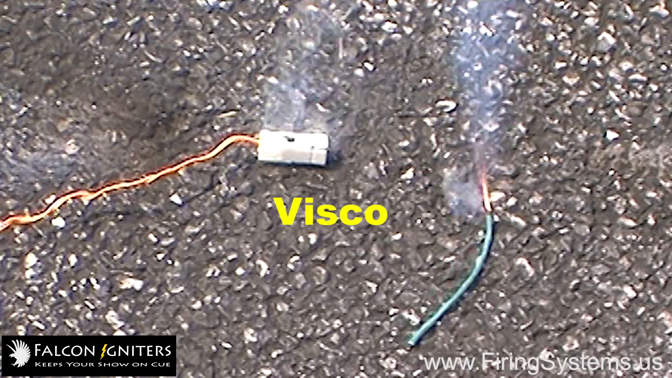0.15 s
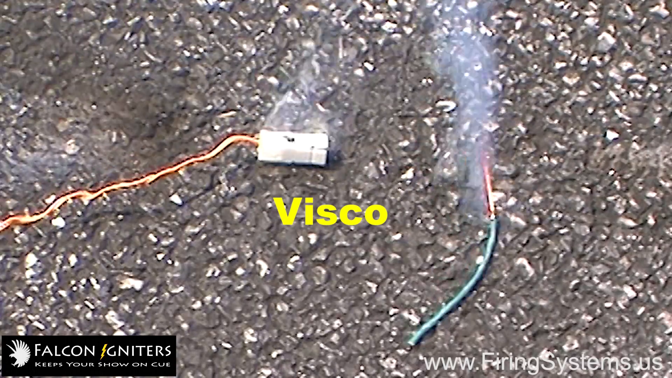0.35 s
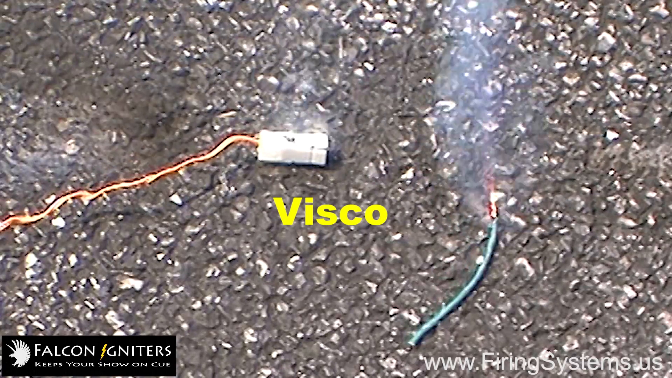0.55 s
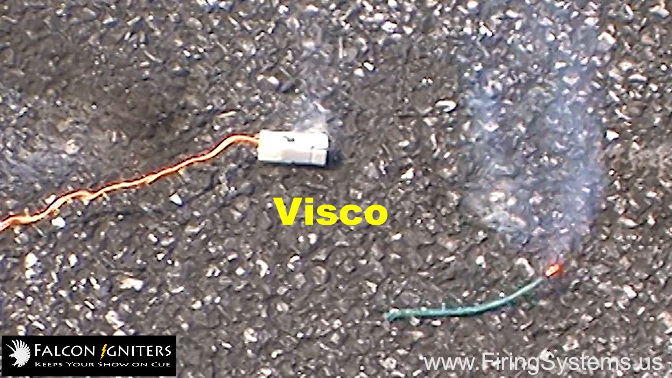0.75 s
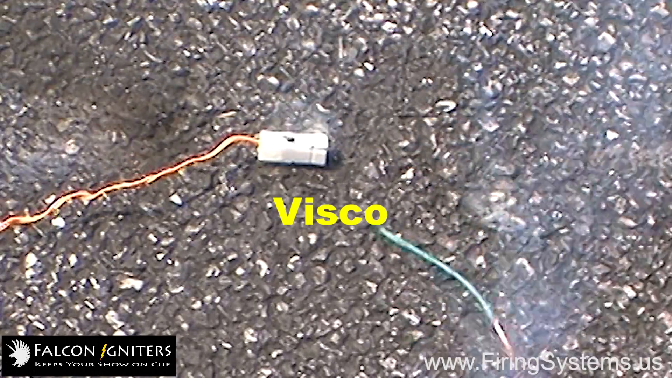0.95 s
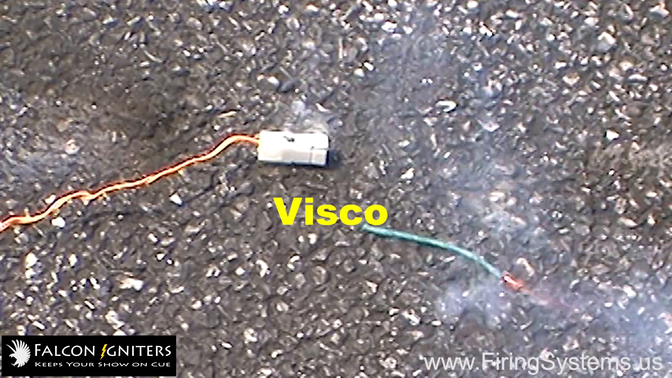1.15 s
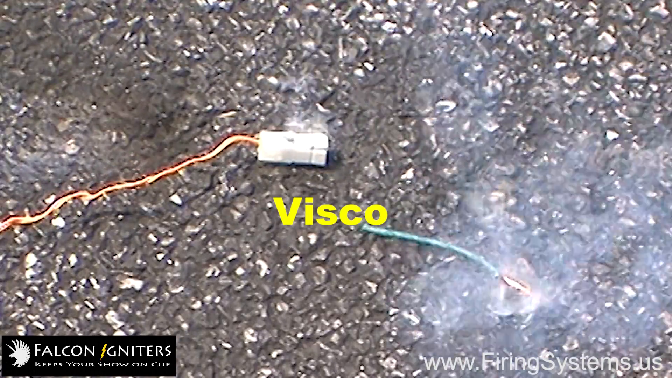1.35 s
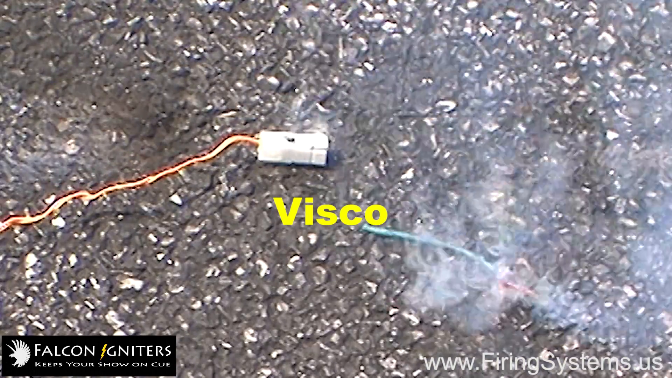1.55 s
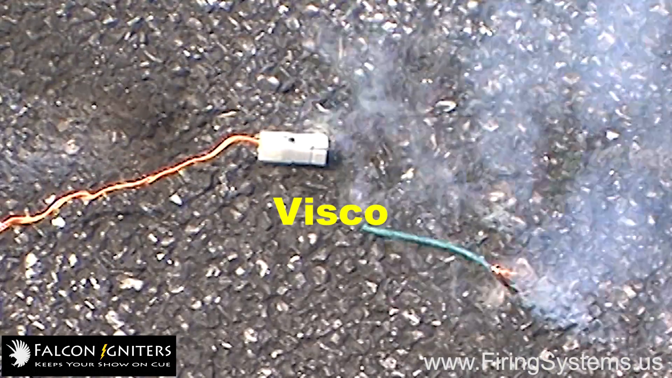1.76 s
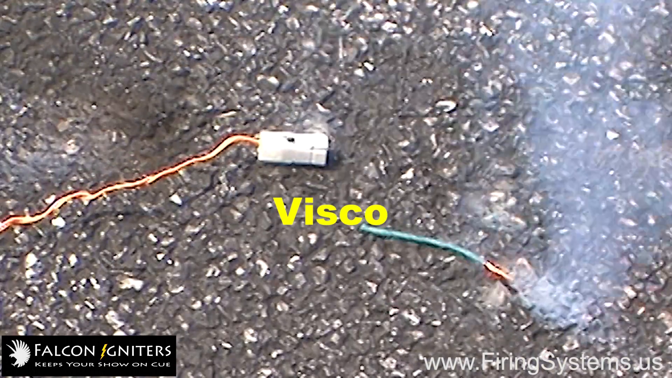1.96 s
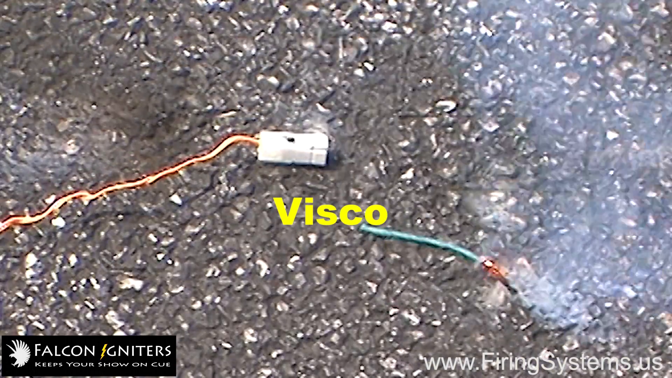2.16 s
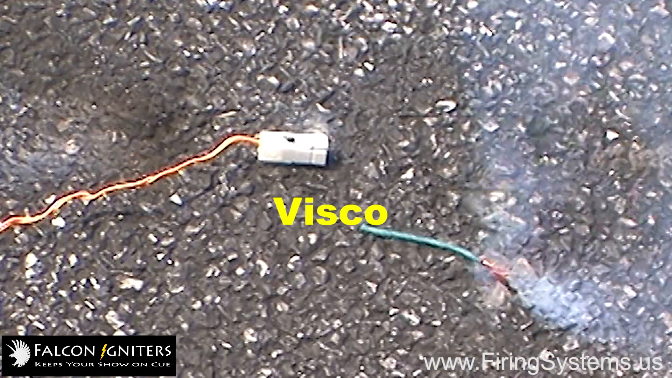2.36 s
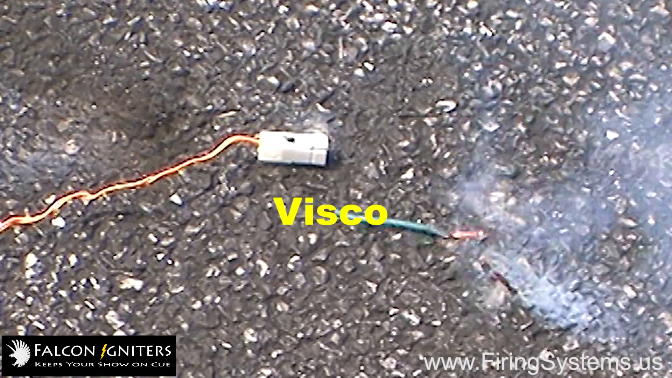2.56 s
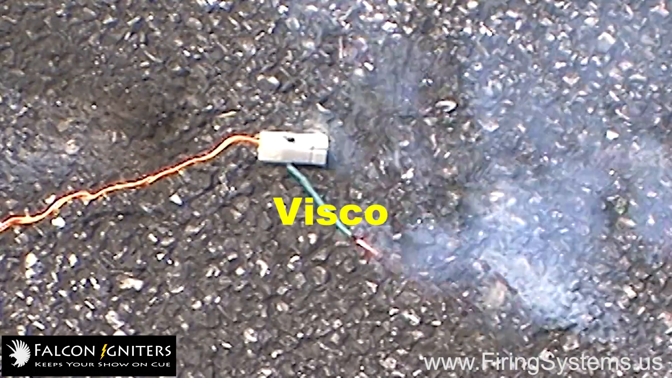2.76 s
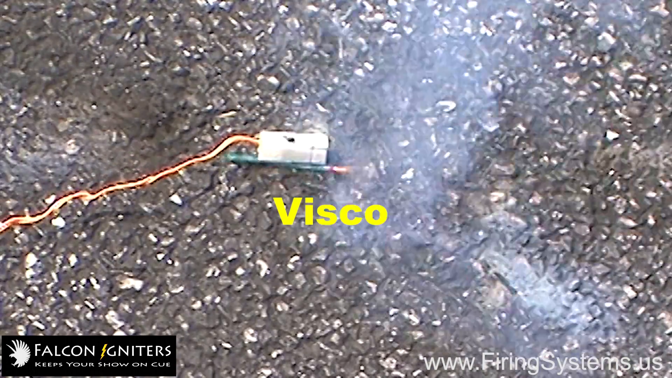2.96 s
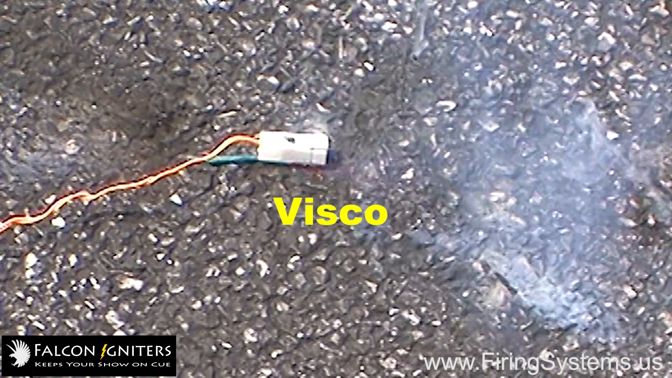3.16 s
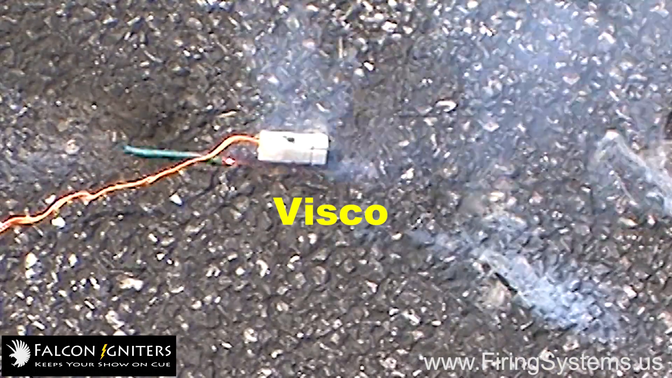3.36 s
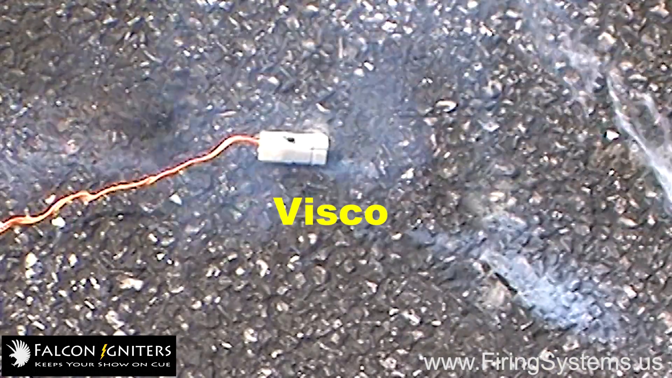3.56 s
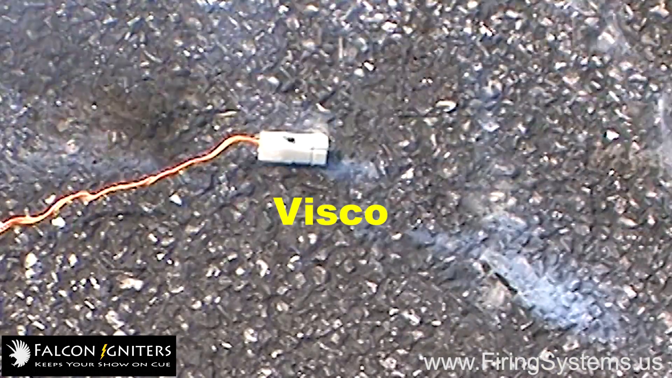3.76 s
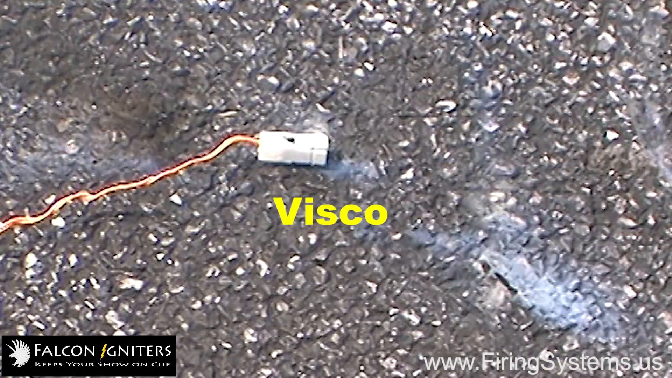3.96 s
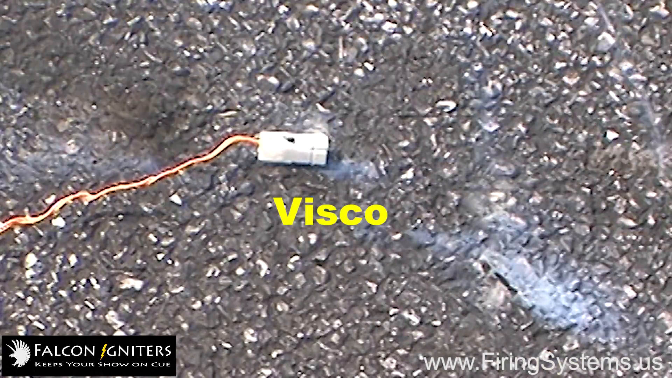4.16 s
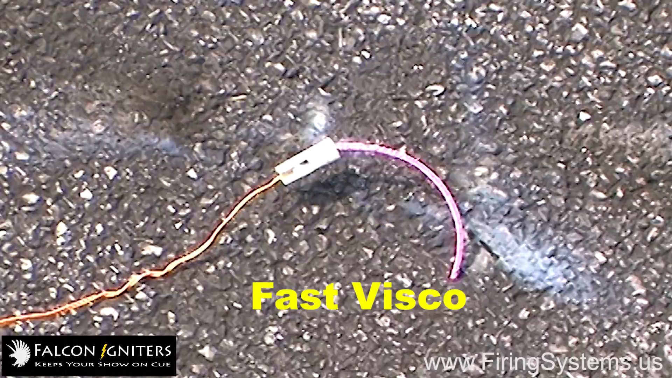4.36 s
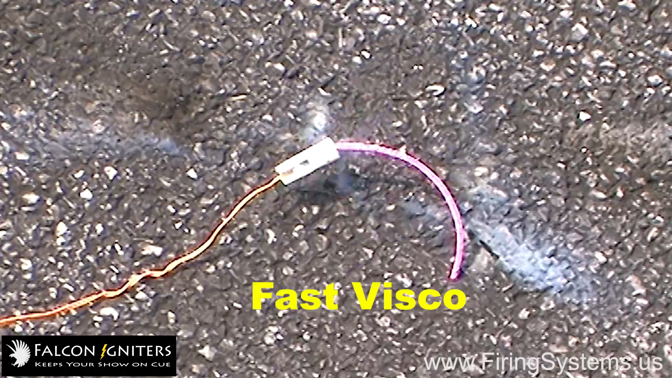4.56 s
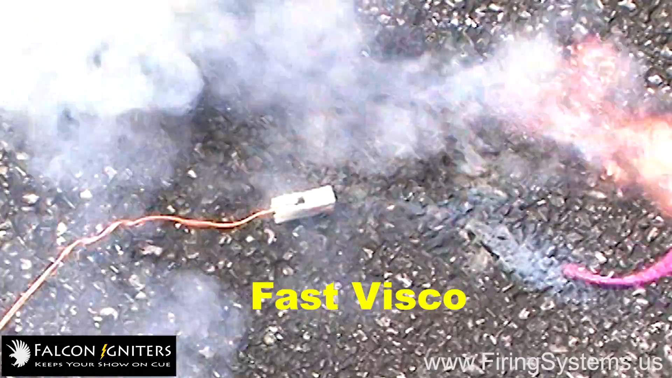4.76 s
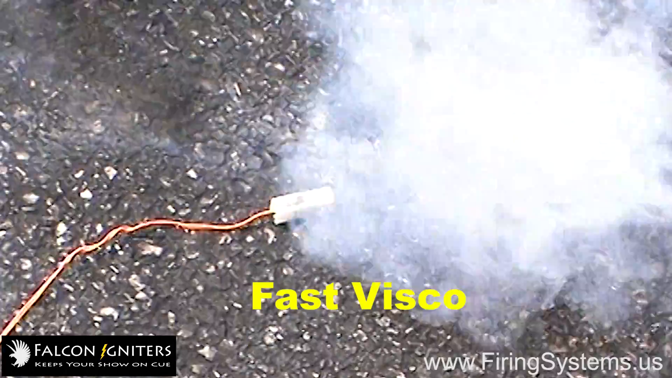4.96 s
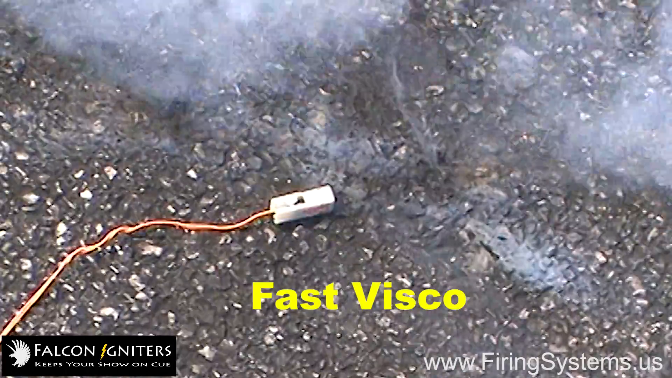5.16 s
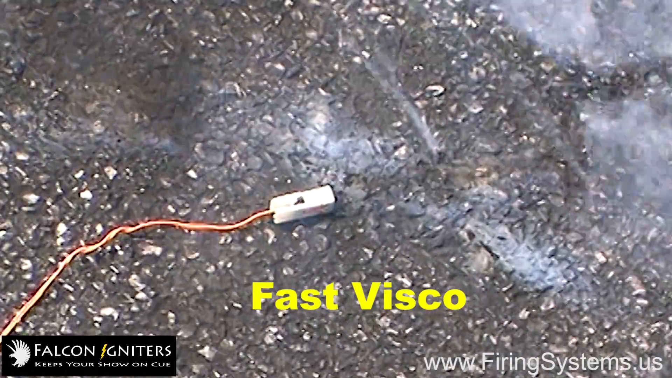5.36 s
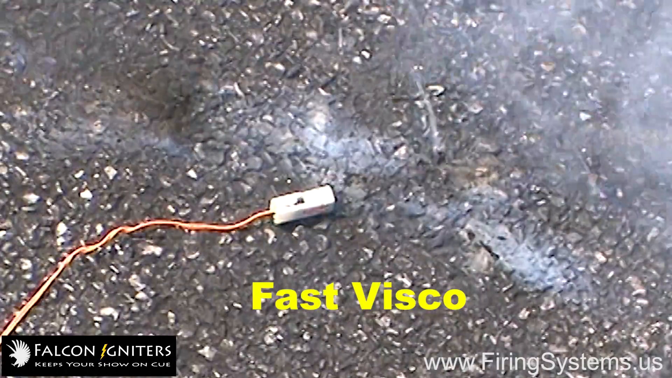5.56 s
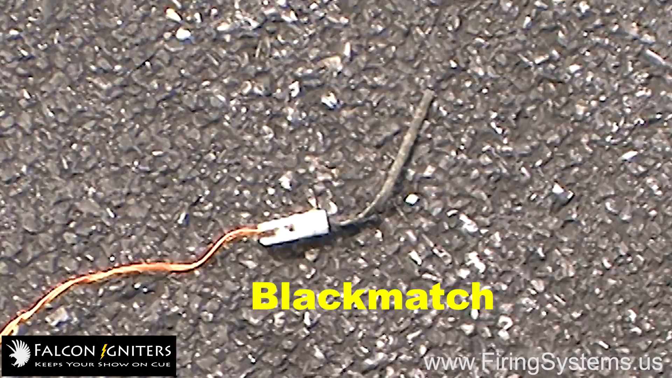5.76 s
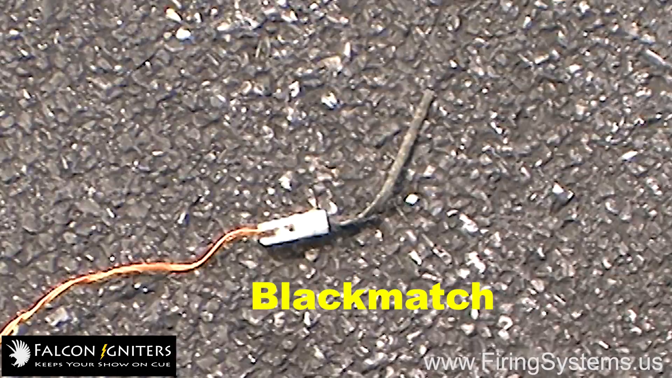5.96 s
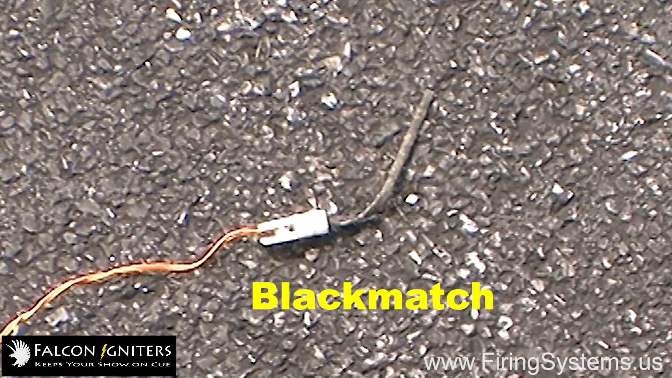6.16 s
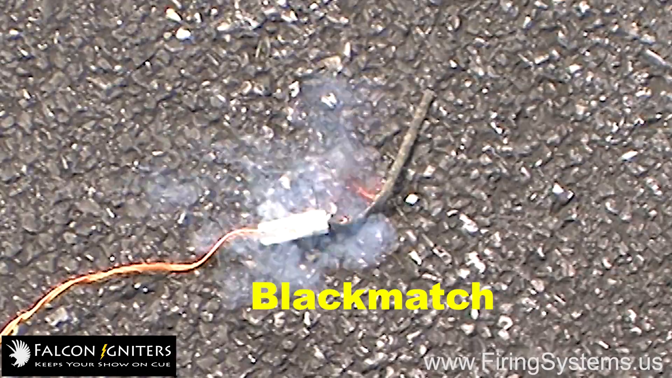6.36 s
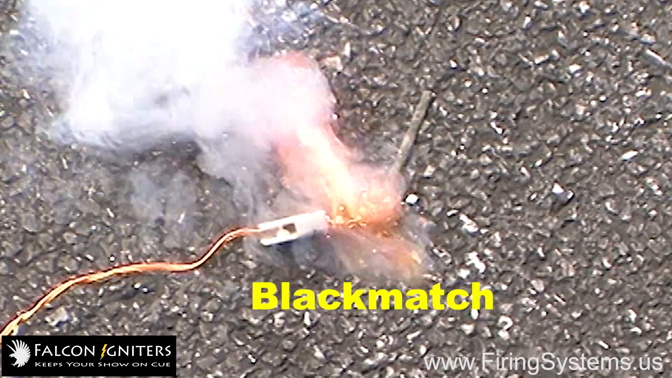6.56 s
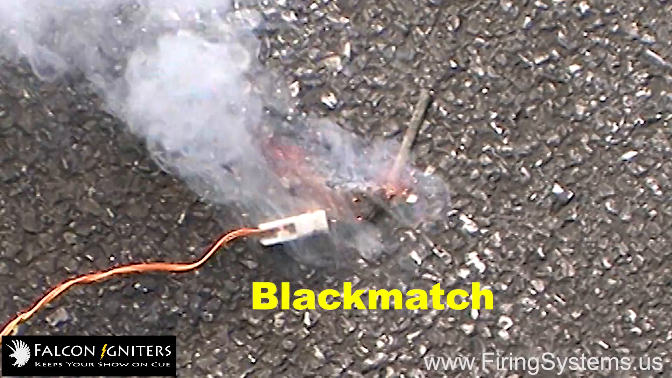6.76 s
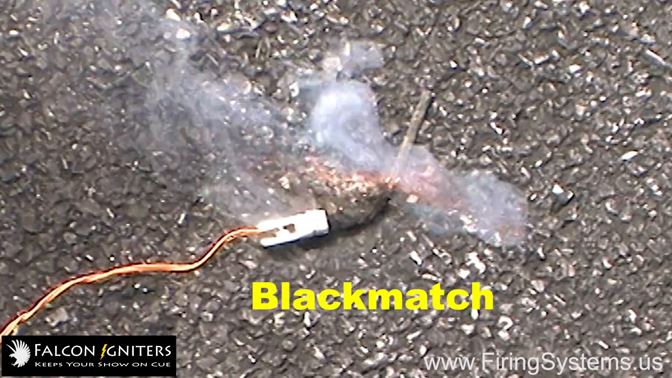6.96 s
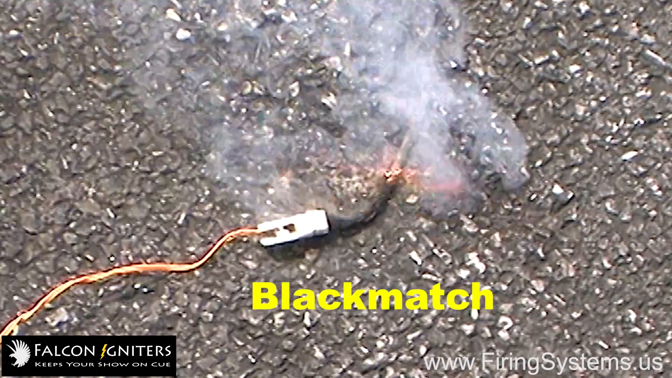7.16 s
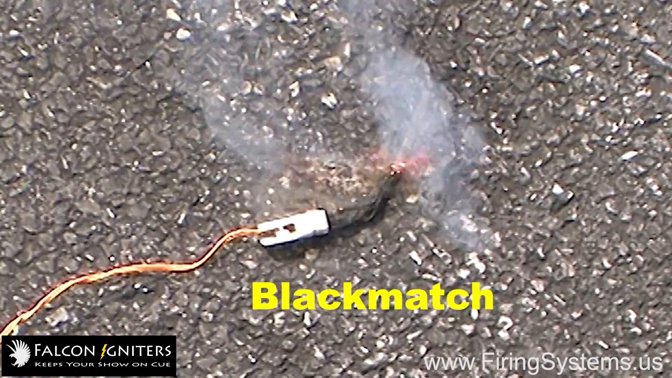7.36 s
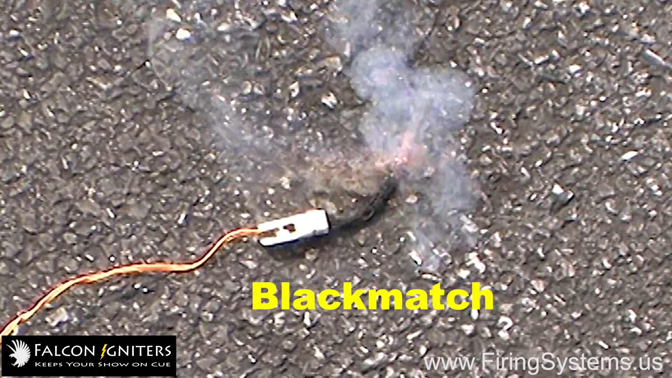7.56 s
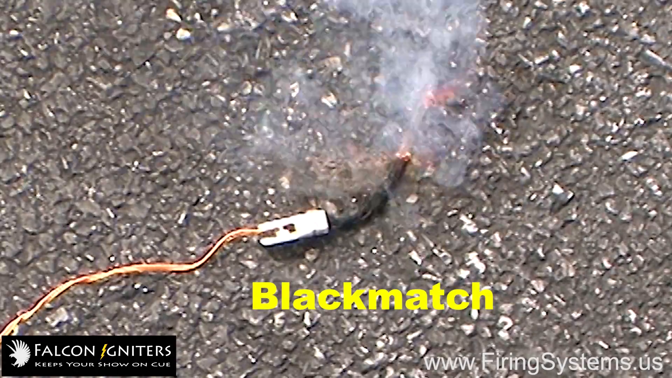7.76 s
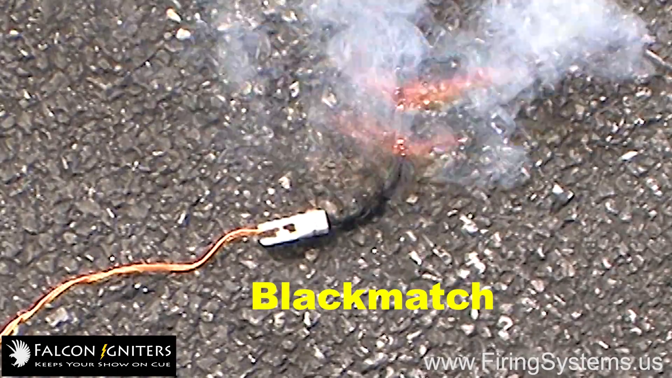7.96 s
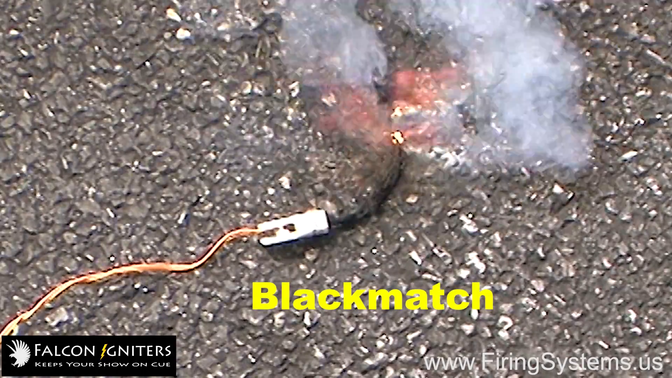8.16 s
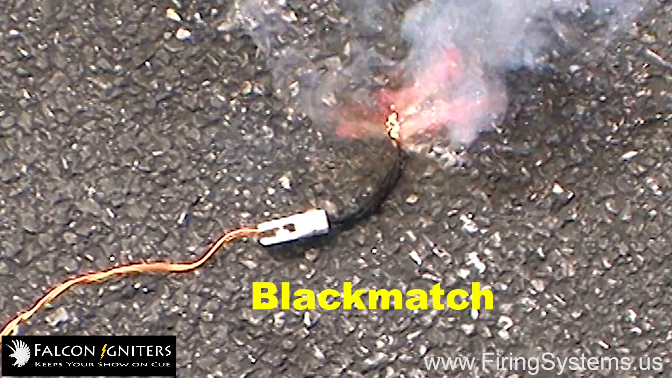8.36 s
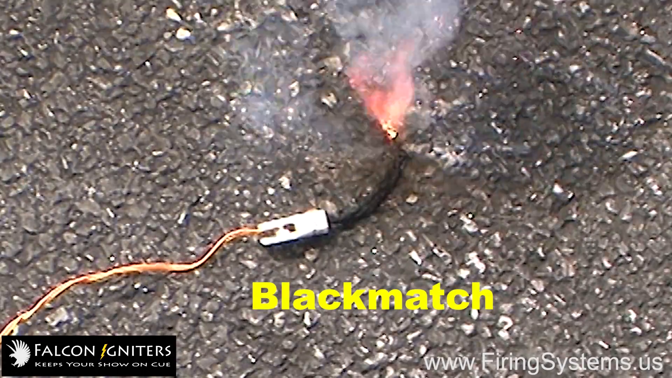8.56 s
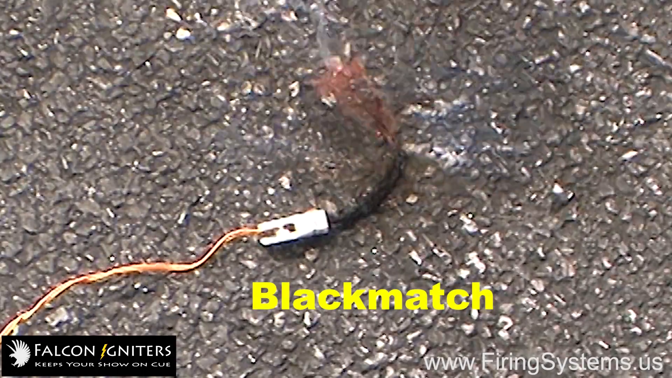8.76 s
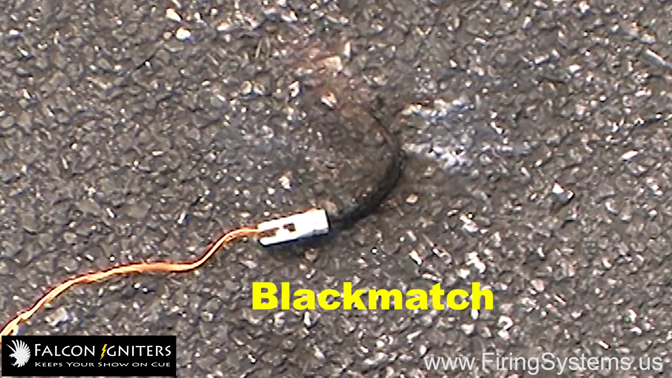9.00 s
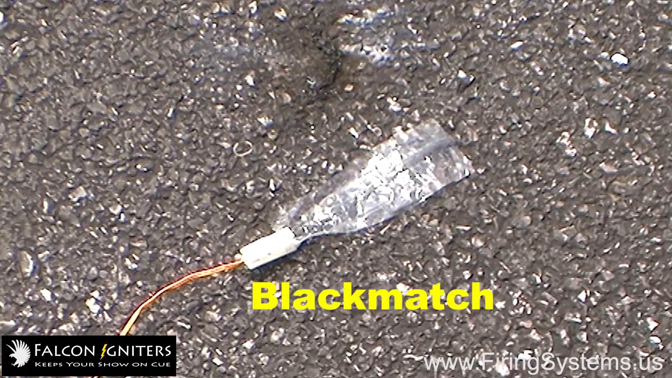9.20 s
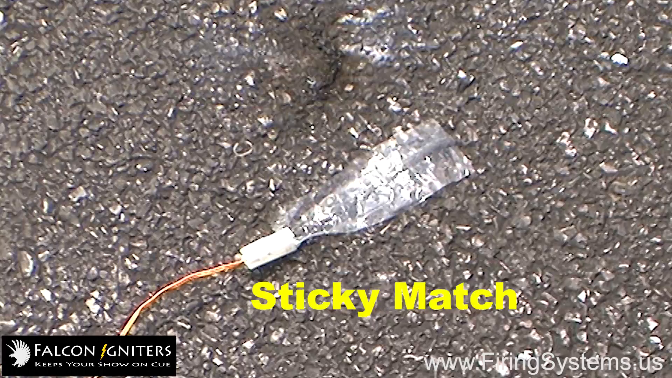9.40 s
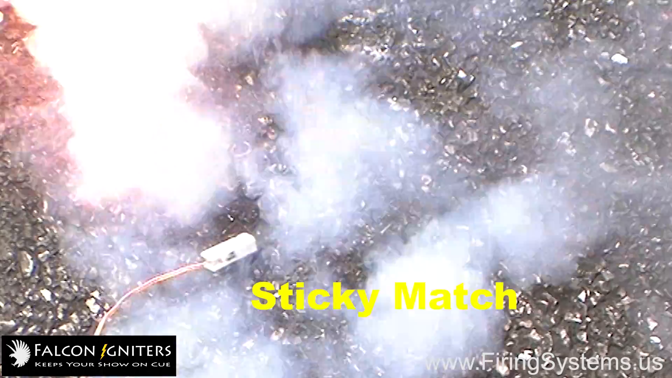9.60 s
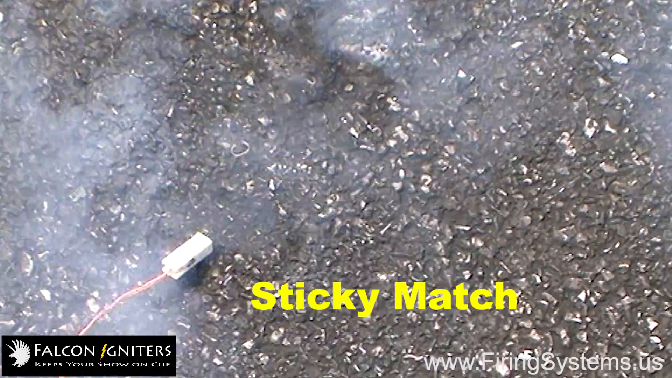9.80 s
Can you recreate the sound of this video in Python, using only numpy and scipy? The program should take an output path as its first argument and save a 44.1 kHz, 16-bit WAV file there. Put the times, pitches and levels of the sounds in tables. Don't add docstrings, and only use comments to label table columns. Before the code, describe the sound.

Outdoors on tarmac, heard from a metre or two away, a burning fuse hisses brightly, spurting, choking and spitting sparks for over four seconds. The scene cuts; a sharp click sets off a ragged rush of gas lasting about half a second. Another cut and click bring a much quieter, thin fizz that dies out, then small ticks and one hard crack with a brief crackle. Faint distant town rumble and insects continue beneath.

```python
import sys
import numpy as np
from scipy import signal
from scipy.fft import rfft, irfft, next_fast_len
from scipy.io import wavfile
from scipy.ndimage import map_coordinates

SR = 44100
rng = np.random.default_rng(int(sys.argv[2]) if len(sys.argv) > 2 else 0)


def file_out(sig):
    cols = np.atleast_2d(sig).T
    lim = np.clip(cols, -1, 1)
    pcm = np.round(lim * 32767).astype(np.int16)
    wavfile.write(sys.argv[1], SR, pcm)


def undo_db(level):
    steps = np.asarray(level, float) / 20
    return 10 ** steps


N = 433591
STEP = 64


def on_log(table, hz):
    f, v = np.transpose(table)
    return np.interp(np.log(hz), np.log(f), v)


def bins_hz(n):
    return np.maximum(np.arange(n // 2 + 1), 1) * SR / n


def walk(n, rate_hz):
    knots = rng.standard_normal(int(n * rate_hz / SR) + 3)
    at = np.arange(0, n + STEP, STEP) * rate_hz / SR
    return 1.4 * map_coordinates(knots, [at], order=3, prefilter=False)


def fine(coarse, n):
    return np.interp(np.arange(n) / STEP, np.arange(len(coarse)), coarse)


def pair(mid, likeness, hz):
    like = np.clip(on_log(likeness, hz), -.5, .99)
    side = rfft(rng.standard_normal(len(mid))) * np.sqrt((1 - like) / 2)
    mid = rfft(mid) * np.sqrt((1 + like) / 2)
    return np.array([mid + side, mid - side])


def bands(spectrum, hz, n):
    for centre_hz in 2 ** np.arange(5, 14.5, .5):
        a, b = np.searchsorted(hz, centre_hz * 2 ** np.array([-.5, .5]))
        part = np.zeros_like(spectrum)
        part[:, a:b] = spectrum[:, a:b] * np.cos(np.pi * np.log2(hz[a:b] / centre_hz)) ** 2
        yield centre_hz, irfft(part, n)


def narrow(centre_hz, width_hz, channels=2):
    hz = bins_hz(2 * next_fast_len(N // 2 + 1))
    shape = (channels, len(hz))
    turn = np.exp(2j * np.pi * rng.random(shape)) * rng.rayleigh(size=shape)
    x = irfft(turn / (1 + (2 * (hz - centre_hz) / width_hz) ** 2))[:, :N]
    return x / x.std()


def spread(pan_db):
    return pan_db * np.array([[.5], [-.5]])


def add(out, start_s, sound):
    i = int(start_s * SR)
    out[:, i:i + sound.shape[-1]] += sound[..., :N - i]


# t/s, town/dB, hum/dB, insects/dB, low insects/dB
SCENES = [
    (0, -47.5, -65, -74, -58),
    (4.34, -49, -69, -65, -72),
    (5.79, -49.5, -68, -70, -82),
    (9.26, -49, -67.5, -66, -64),
]


def scene_gain(column):
    s, level_db = np.transpose(SCENES)[[0, column]]
    return undo_db(level_db[np.searchsorted(s, np.arange(N) / SR, "right") - 1])


# f/Hz, level/dB per Hz
TOWN_COLOUR = [(88, -48), (150, -21.5), (230, -16.5), (314, -11.5), (339, -13), (481, -6), (510, -10.5),
               (562, -5), (798, -11), (1150, -12), (2370, -22), (6630, -35), (7750, -29), (15600, -44.5)]
# f/Hz, width/Hz, level/dB
MACHINES = [(346, 14, -64), (478, 20, -66), (545, 14, -60.5), (588, 18, -64), (680, 25, -70)]
# f/Hz, left-right likeness [-1..1]
TOWN_LIKENESS = [(60, 0.68), (130, 0.62), (290, 0.89), (640, 0.78), (1410, 0.35), (3100, 0.32),
                 (6820, -0.27), (15000, -0.37)]


def town():
    n = 2 * next_fast_len(N // 2 + 1)
    hz = bins_hz(n)
    spectrum = pair(rng.standard_normal(n), TOWN_LIKENESS, hz) * undo_db(on_log(TOWN_COLOUR, hz))
    rumble = sum(band[:, :N] * fine(undo_db(walk(N, 6)), N) for _, band in bands(spectrum, hz, n))
    machines = sum(narrow(f, w, channels=1) * undo_db(db + 49.5) for f, w, db in MACHINES)
    return (rumble / rumble.std() + machines) * scene_gain(1) * undo_db(spread(2.6))


def hum():
    tone = np.sqrt(2) * np.sin(2 * np.pi * 120 * np.arange(N) / SR)
    return scene_gain(2) * tone * fine(undo_db(0.55 * walk(N, 4)), N) + undo_db(-79.5) * narrow(87, 60)


def insects():
    t = np.arange(N) / SR
    throb = 1 + .5 * np.sin(2 * np.pi * 31 * t + 1.5 * fine(walk(N, 6), N))
    out = scene_gain(3) * throb * narrow(7800, 450) + scene_gain(4) * narrow(4060, 500)
    return out + undo_db(-68) * (t < 5.79) * narrow(8230, 40)


# from/Hz, to/Hz
REGIONS = [(1700, 3700), (500, 1300), (4000, 7000), (8000, 14000)]
HISS_FOLLOWS = 0.49


def jet(out, burn, spurts, air, dips, likeness, roar_db, roar_steady, hiss_db,
        gust_db, flicker_db, spark_db, sparks_per_s):
    s, level_db, aim_db, pan_db = np.transpose(burn)
    n = next_fast_len(int((s[-1] - s[0]) * SR) + 999)
    t = s[0] + np.arange(0, n + STEP, STEP) / SR
    hz = bins_hz(n)
    spark = undo_db(spark_db + 7.1 * np.minimum(rng.exponential(size=n), 2))
    spark = spark * (rng.random(n) < sparks_per_s / SR)
    dip_db = sum(db * np.exp(-((hz - f) / w) ** 2) for f, w, db in dips)
    gain = undo_db(on_log(air, hz) + dip_db)
    share = [np.sqrt(2 * np.sum(gain[(hz > a) & (hz < b)] ** 2) / n) for a, b in REGIONS]
    spectrum = pair(rng.standard_normal(n) * (1 + spark), likeness, hz) * gain / share[0]

    level = np.interp(t, s, level_db)
    aim = np.interp(t, s, aim_db)
    for at_s, db, half_ms, sizzle_db in spurts:
        bump = np.exp(-((t - at_s) * 1000 / half_ms) ** 2)
        level = level + db * bump
        aim = aim + sizzle_db * bump

    colour_db = roar_db - roar_steady * (level - level.mean()), hiss_db + HISS_FOLLOWS * aim, aim
    roar, hiss, sizzle = (db - 20 * np.log10(g / share[0]) for db, g in zip(colour_db, share[1:]))
    gust = gust_db * walk(n, 45)
    sound = 0
    for centre_hz, band in bands(spectrum, hz, n):
        low, high, top = np.clip(np.log2([2000 / centre_hz, centre_hz / 2600, centre_hz / 5400]), 0, 1)
        balance = low * roar + (high - top) * hiss + top * sizzle
        sound = sound + band * fine(undo_db(balance + gust + flicker_db * walk(n, 25)), n)

    edge = np.clip(np.minimum(t - s[0] + 0.0041, s[-1] + 0.0021 - t) / 0.0055, 0, 1)
    gains = edge * undo_db(level + spread(np.interp(t, s, pan_db)))
    add(out, s[0], sound * [fine(g, n) for g in gains])


# f/Hz, left-right likeness [-1..1]
JET_LIKENESS = [(60, 0.46), (130, 0.76), (290, 1), (640, 0.92), (1410, 1), (3100, 0.95), (6820, 0.87),
                (15000, 0.63)]
# t/s, level/dB, top sizzle above jet/dB, left minus right/dB
SLOW_BURN = [
    (0, -37, -5.5, 0.0),
    (0.6, -42.5, -4.5, 0.0),
    (1.3, -41, 0.0, 0.0),
    (1.9, -41.5, -0.5, -0.5),
    (2.6, -39, -0.5, 0.5),
    (3.0, -37, -2, 0.3),
    (3.5, -38, 2.5, 0.2),
    (4.05, -40.5, -0.5, 5.5),
    (4.328, -44, -0.5, 7.5),
]
# t/s, level/dB, half length/ms, extra sizzle/dB
SLOW_GUSTS = [(0.07, 0.5, 40, 1.5), (0.36, 2.5, 50, -2), (0.6, -0.5, 40, 3.5), (0.81, 4, 114, 0),
              (0.9, -5, 48, -3.5), (1.015, 6, 46, 4.5), (1.09, 5, 34, -3.5), (1.18, 6, 69, -0.5),
              (1.67, -3, 68, 2.5), (1.99, 2, 66, 3), (2.22, 0, 33, 4.5), (2.29, -4.5, 27, 2.5),
              (2.36, 2.5, 49, 2), (2.51, 1.5, 30, -1), (2.62, 4, 21, -1), (2.76, -3, 78, -2),
              (2.86, 1, 45, -3.5), (2.96, -3.5, 51, -6.5), (3.2, 0.5, 77, 4), (3.09, -1, 46, 0.5),
              (3.31, -3.5, 67, 1), (3.4, -0.5, 55, 5), (0.52, -0.5, 25, 3.5), (0.67, -0.5, 27, 3),
              (3.82, 0.5, 27, -4), (3.47, -1, 23, -3.5), (3.7, 1, 50, 1), (3.9, -1, 75, 5),
              (4.075, 0.0, 17, -9), (4.26, 1, 76, 7.5), (4.22, 1.5, 30, 0), (4.3, -1.5, 20, 0),
              (4.0, -1.5, 30, 0), (2.13, 1, 35, 0)]
# f/Hz, level/dB per Hz
SLOW_COLOUR = [(470, -23.5), (800, -6), (1710, -6.5), (2480, -2), (3400, -1.5), (4000, -2.5), (8480, -3),
               (12800, -7), (15700, -14)]
# f/Hz, width/Hz, depth/dB
SLOW_NOTCHES = [(1650, 140, -1.5), (3810, 190, -2.5), (12020, 400, -4), (14100, 900, -2.5)]


def slow_fuse(out):
    jet(out, SLOW_BURN, SLOW_GUSTS, SLOW_COLOUR, SLOW_NOTCHES, JET_LIKENESS,
        roar_db=-9, roar_steady=0.37, hiss_db=-1.64,
        gust_db=.7, flicker_db=.8, spark_db=-2, sparks_per_s=160)


# f/Hz, left-right likeness [-1..1]
BLAZE_LIKENESS = [(60, 0.65), (130, 1), (290, 0.99), (640, 0.99), (1410, 0.93), (3100, 0.95), (6820, 0.71),
                  (15000, 0.66)]


def puffs(out, pockets, rise_ms, rise_share):
    n, lead = 16384, 6144
    ms = (np.arange(n) - lead) / SR * 1000
    hz = bins_hz(n)
    for peak_s, db, fall_ms, centre_hz, octaves in pockets:
        rise = max(rise_ms + rise_share * fall_ms, 1)
        colour = np.exp(-(np.log2(hz / centre_hz) / octaves) ** 2 / 2) * (hz / centre_hz) ** -.4
        colour = colour / (1 + (hz / 14000) ** 4) / (1 + (150 / hz) ** 3)
        rush = irfft(pair(rng.standard_normal(n), BLAZE_LIKENESS, hz) * colour, n)
        swell = np.exp(np.where(ms < 0, ms / rise, -ms / fall_ms))
        add(out, peak_s - lead / SR, rush / rush.std() * undo_db(db) * swell)


# peak t/s, level/dB, fall/ms, f/Hz, width/octaves
STRAY_POCKETS = [
    (6.36, -49, 60, 6300, 0.3),
    (6.53, -50, 90, 1250, 0.4),
    (6.52, -46, 130, 500, 1.5),
    (3.36, -38, 90, 6000, 0.3),
    (3.2, -40, 60, 6300, 0.3),
    (8.87, -63, 110, 4020, 2.1),
    (9.274, -61, 51, 5000, 2),
    (9.391, -51.5, 13, 4000, 2.1),
]


def stray_puffs(out):
    puffs(out, STRAY_POCKETS, rise_ms=7, rise_share=0.2)


# t/s, level/dB
THUMPS = [
    (4.345, -62),
    (5.795, -62),
    (9.27, -62),
]


def scene_changes(out):
    for s, db in THUMPS:
        add(out, s, undo_db(db) * np.array([[1.5], [-.5]]) * np.hanning(400))


# t/s, peak/dB, ring f/Hz, body above
# ring/dB, left minus right/dB
CLICKS = [(4.577, -29.5, 6600, -1.5, 15), (4.582, -37, 8240, -1, -3), (4.68, -8.5, 8200, -9, 1),
          (4.6922, -13, 3190, -2, 1.0), (6.2331, -32.5, 9700, -4, 14), (6.6474, -38, 3100, -1, -9),
          (9.2748, -49, 4550, -3, 1.5), (9.2903, -45, 3590, -5, 1.0), (9.3174, -49, 3160, -3, 0.5),
          (9.3621, -44, 3440, -6, 0.5), (9.3891, -48, 4200, -7, 1.5), (9.4014, -50, 3220, 3, 2.0),
          (9.5612, -29, 7400, -10, 20), (9.5664, -35, 7310, -5, -4), (6.2385, -47, 4200, -1.5, -3)]


def switch_snaps(out):
    t = np.arange(900) / SR
    for s, db, ring_hz, body_db, pan_db in CLICKS:
        crack = rng.standard_normal(len(t)) * (np.exp(-t / 0.0007) + 0.14 * np.exp(-t / 0.0041))
        mode = signal.iirpeak(ring_hz, 1.6, SR)
        ring = signal.lfilter(*mode, signal.lfilter(*mode, crack))
        body = signal.lfilter(*signal.iirpeak(2000, .6, SR), crack)
        snap = ring / np.abs(ring).max() + undo_db(body_db) * body / np.abs(body).max()
        snap = signal.lfilter(*signal.butter(N=4, Wn=12500, fs=SR), snap)
        add(out, s + 0.00049, snap * undo_db(db + spread(pan_db)))


# t/s, level/dB, top sizzle above jet/dB, left minus right/dB
FAST_BURN = [
    (4.69, -31, 2.5, 1),
    (4.77, -36, -8, 0.5),
    (4.815, -28.5, 1, 0.5),
    (4.94, -32.5, -2.5, 0.5),
    (5.005, -28.5, -1, -1.5),
    (5.08, -32.5, -2, -4.5),
    (5.255, -44.5, -2, -5.5),
    (5.36, -59.5, -1, 1.0),
    (5.55, -66, -22, 2.0),
]
# t/s, level/dB, half length/ms, extra sizzle/dB
FAST_GUSTS = [(4.91, -2, 9, -3), (4.958, 5.5, 15, -13), (5.088, -6, 6, -5), (5.115, 5, 11, -4.5),
              (5.134, -10, 5, 6), (5.17, 5, 9, -2.5), (4.84, 1.5, 15, -4.5), (4.745, 3, 7.6, -1),
              (5.285, -2, 18, -1), (5.248, 2.5, 12, -4), (5.5, 3, 30, -2), (5.14, -3.5, 45, 3.5),
              (5.2, 0, 30, 2), (4.815, -2, 22, -2.5), (4.985, -2.5, 9, -2), (4.915, 1.5, 12, 2),
              (4.715, 0, 9, 4), (5.145, 2, 6, 2), (4.79, 1, 12, 2), (4.73, -2, 8, -3), (5.06, -1, 10, 0)]
# f/Hz, level/dB per Hz
FAST_COLOUR = [(24, -67), (40, -33), (136, -16), (241, -15), (378, -2.5), (608, -3.5), (672, -0.5),
               (1390, -8.5), (1650, -15), (2170, -12), (5200, -12.5), (7200, -14.5), (11600, -23.5),
               (15600, -33)]
# f/Hz, width/Hz, depth/dB
FAST_NOTCHES = [(1650, 160, -1.1), (5440, 380, -0.88)]
# peak t/s, level/dB, fall/ms, f/Hz, width/octaves
FAST_POCKETS = [(4.683, -23, 15, 8740, 0.36), (4.692, -22, 4.2, 1500, 2), (4.704, -25, 15, 900, 0.8),
                (4.718, -18.5, 4.4, 1490, 1.2), (4.811, -27, 8, 2500, 1.1), (4.881, -21, 7, 3000, 2.8),
                (4.997, -21, 35, 1800, 1.8), (5.044, -21, 3.6, 1490, 1.07), (5.098, -33, 6, 800, 0.8),
                (5.168, -34, 5.5, 5900, 0.18), (5.208, -34, 5, 6500, 0.2), (5.228, -34, 20, 700, 0.9),
                (5.256, -28.5, 3.6, 900, 0.83), (4.712, -28, 4, 1600, 0.8), (4.73, -30, 8, 700, 0.7),
                (4.765, -35, 8, 700, 0.7), (4.852, -30, 6, 1500, 1.2), (4.897, -29, 5, 1200, 1),
                (4.95, -27, 8, 1200, 1.2), (5.02, -26, 6, 1200, 1.2), (5.072, -29, 7, 2800, 0.3),
                (5.088, -29, 8, 650, 0.6), (5.112, -30, 8, 2600, 0.3), (5.124, -30, 3, 2800, 0.25),
                (5.138, -31, 10, 600, 0.6), (5.157, -30, 4, 550, 0.6), (5.165, -33, 8, 2600, 0.4),
                (5.177, -30, 5, 600, 0.6), (5.197, -35, 6, 6300, 0.25), (5.242, -32, 8, 1100, 0.8),
                (4.715, -36, 15, 280, 0.5), (4.84, -34, 8, 300, 0.5), (4.962, -31, 12, 280, 0.5),
                (5.092, -33, 8, 330, 0.45), (5.128, -35, 10, 350, 0.4), (5.166, -35, 16, 350, 0.4),
                (5.056, -28, 8, 900, 0.7), (4.893, -31, 6, 1100, 0.6), (5.232, -41, 10, 7000, 0.5)]


def fast_fuse(out):
    jet(out, FAST_BURN, FAST_GUSTS, FAST_COLOUR, FAST_NOTCHES, BLAZE_LIKENESS,
        roar_db=1.76, roar_steady=0.29, hiss_db=-4,
        gust_db=1, flicker_db=1.6, spark_db=-9, sparks_per_s=500)
    puffs(out, FAST_POCKETS, rise_ms=5.5, rise_share=0.01)


# f/Hz, level/dB per Hz
BARE_COLOUR = [(410, -15), (700, -2.5), (829, 0), (956, -11), (1220, -1.5), (1610, -8), (2140, -2.5),
               (3500, -3.5), (4430, -5), (7840, -6.5), (9400, -5.5), (13200, -10.5), (15600, -19)]
# f/Hz, width/Hz, depth/dB
BARE_NOTCHES = [(1650, 200, -0.5), (4400, 350, -1), (10600, 350, -3)]


def weak_jet(out, burn, spurts, **settings):
    jet(out, burn, spurts, BARE_COLOUR, BARE_NOTCHES, JET_LIKENESS,
        roar_db=-4.5, roar_steady=0.17, hiss_db=-0.4, **settings)


# t/s, level/dB, top sizzle above jet/dB, left minus right/dB
BARE_BURN = [
    (6.345, -57.5, -1, 1.0),
    (6.4, -51, -2.5, 1.0),
    (6.6, -48, -1, 1.1),
    (6.8, -54.5, -1, 1.0),
    (7.05, -57, 5, 0.8),
    (7.62, -59, 2.0, 1.0),
    (8.28, -53, 4, 0.5),
    (8.68, -55.5, -2, 0.6),
    (8.9, -74, 4, 1.5),
]
# t/s, level/dB, half length/ms, extra sizzle/dB
BARE_GUSTS = [(6.48, -2.5, 40, 0.0), (7.02, -1, 30, -7), (7.12, 1, 50, -3), (7.36, 0.0, 70, 4.5),
              (7.89, 3.5, 60, -1), (8.04, 2, 50, -5), (8.56, 2, 25, -4), (8.8, 4.5, 25, 2),
              (6.4, 0, 40, 1.5), (7.75, 2.5, 25, -6)]


def bare_fuse(out):
    weak_jet(out, BARE_BURN, BARE_GUSTS, gust_db=0.5, flicker_db=0.84, spark_db=-8, sparks_per_s=46)


# peak t/s, level/dB, fall/ms, f/Hz, width/octaves
BLAST_POCKETS = [(9.649, -21.5, 6.9, 6000, 1.2), (9.65, -18.5, 7.3, 2470, 1.55),
                 (9.659, -18.5, 5.4, 2500, 1.6), (9.67, -18, 4.6, 4000, 1.8), (9.679, -16, 1.7, 2400, 3.6),
                 (9.683, -2, 2.3, 8000, 1.5), (9.689, -24, 4, 1200, 0.9), (9.713, -37, 16, 2200, 1.2),
                 (9.714, -42, 14, 9000, 0.4), (9.798, -38.5, 3.1, 4000, 1.3), (9.684, -17, 6, 200, 0.6),
                 (9.679, -11, 2.5, 780, 0.4), (9.6785, -7.5, 2, 4000, 1.6), (9.654, -31, 5, 12000, 0.4),
                 (9.696, -31, 5, 650, 0.4), (9.748, -44, 8, 2500, 1.5)]


def blast(out):
    puffs(out, BLAST_POCKETS, rise_ms=4.2, rise_share=-0.12)


# t/s, level/dB, top sizzle above jet/dB, left minus right/dB
EMBER_BURN = [
    (9.7, -64, -19, 0.0),
    (9.76, -48.5, -6, 1.0),
    (9.83, -59, 1, -1),
]


def embers(out):
    weak_jet(out, EMBER_BURN, [], gust_db=-2.0, flicker_db=1.2, spark_db=3, sparks_per_s=100)


def scene():
    out = town() + hum() + insects()
    for source in (slow_fuse, stray_puffs, scene_changes, switch_snaps, fast_fuse, bare_fuse, blast, embers):
        source(out)
    return out


def band_limit(x):
    return signal.sosfilt(signal.butter(12, 16730, fs=SR, output="sos"), x)


def record(dry):
    n = next_fast_len(N + 4096)
    hz = np.arange(n // 2 + 1) * SR / n
    soft = np.tanh(1.3 * dry) / 1.3
    top_cut = np.clip((15750 + 200 - hz) / 250, 0, 1) ** 2
    bass_cut = hz ** 2 / (hz ** 2 + 35 ** 2)
    mix = irfft(rfft(soft, n) * top_cut * bass_cut, n)[:, :N]
    return band_limit(mix)


dry = scene()
out = record(dry)
file_out(out)
```